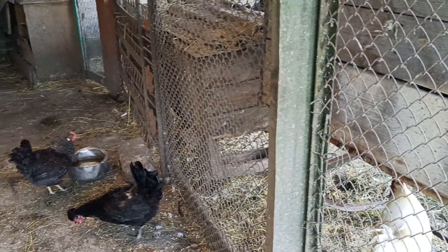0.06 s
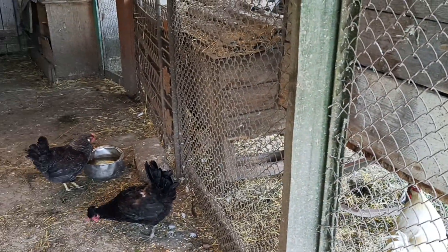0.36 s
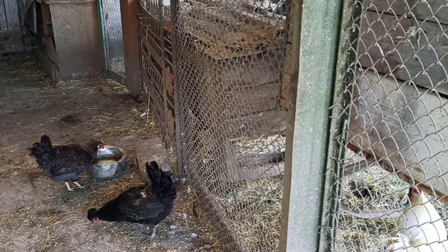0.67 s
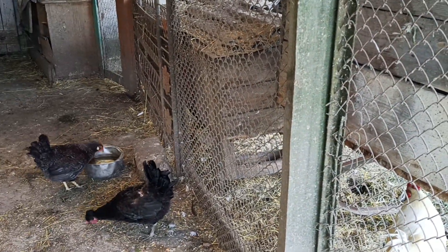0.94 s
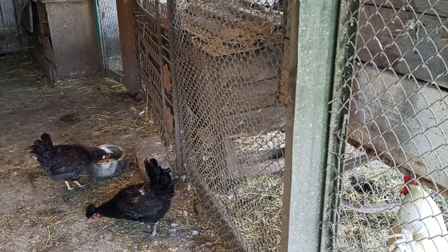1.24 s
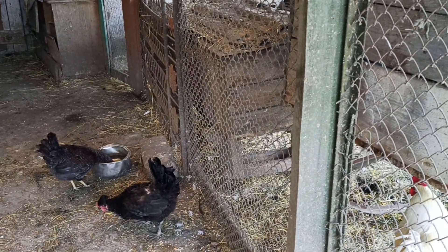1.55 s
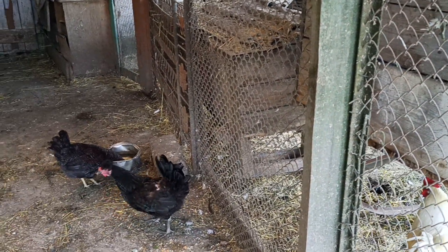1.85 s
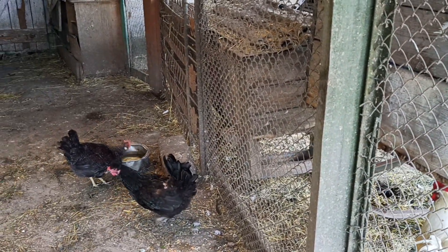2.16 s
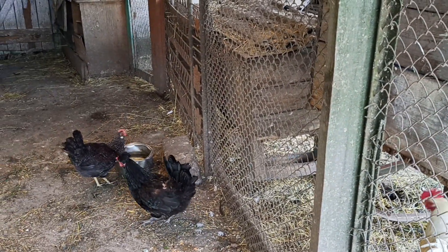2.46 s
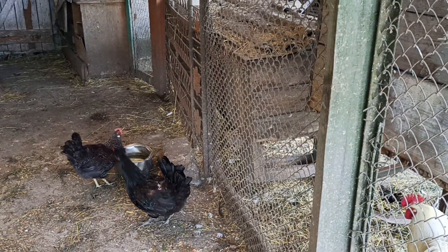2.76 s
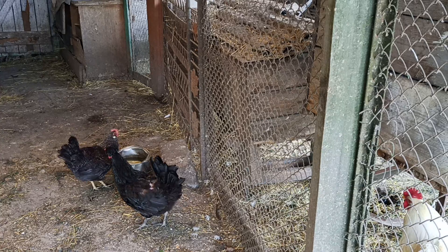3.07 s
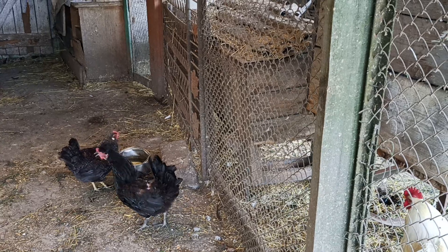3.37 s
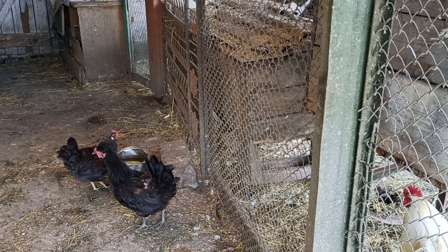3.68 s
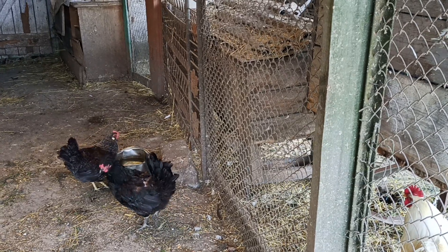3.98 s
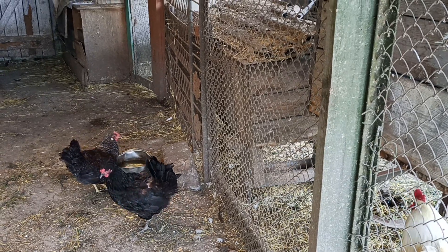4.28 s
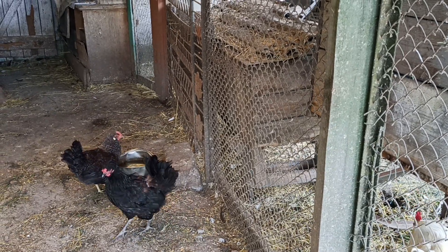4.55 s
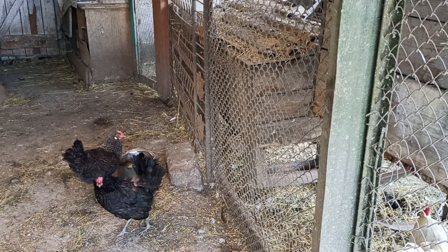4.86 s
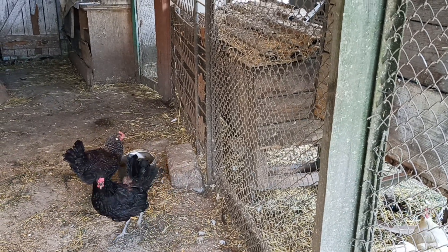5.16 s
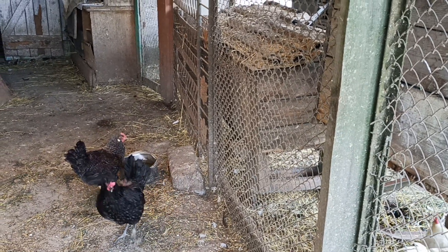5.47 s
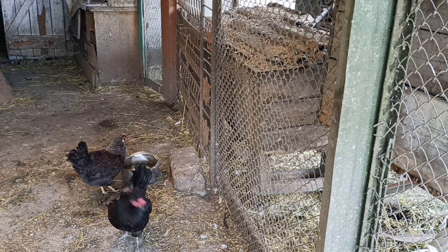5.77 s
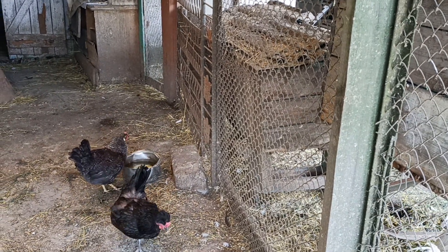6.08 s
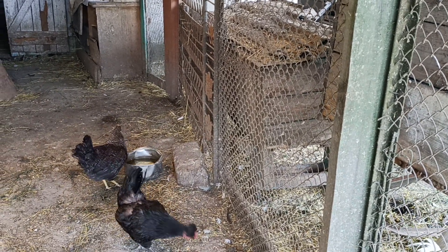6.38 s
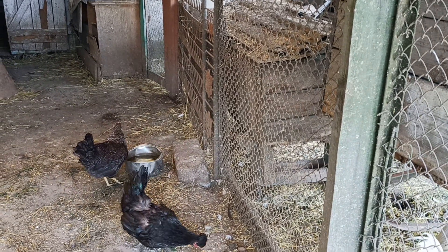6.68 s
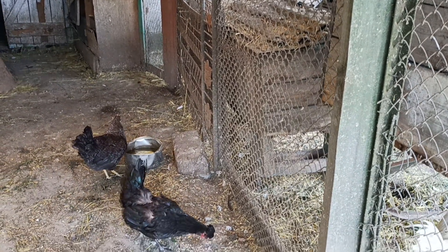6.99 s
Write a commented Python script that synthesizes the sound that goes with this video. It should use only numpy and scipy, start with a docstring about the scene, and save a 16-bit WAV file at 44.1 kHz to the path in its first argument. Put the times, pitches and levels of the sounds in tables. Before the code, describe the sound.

Hens cluck and cackle in a wire coop, one drawing out a hoarse moan, while a small bird chirps faintly far off.

```python
"""Hens cluck in a wire coop with board walls; five times a run of clucks bursts into a loud cackle
whose pitch breaks upward. One hen draws out a hoarse moan, faintly at first and later long and loud.
Each voice is a source and a filter: membranes in the syrinx pulse, and throat and beak resonate.
Beaks tick on the ground, a small bird whistles far off, and the boards reverberate over faint air."""
import sys
import numpy as np
from scipy import signal
from scipy.fft import rfft, irfft, next_fast_len
from scipy.io import wavfile
from scipy.ndimage import uniform_filter1d, minimum_filter1d, map_coordinates

SR = 44100
rng = np.random.default_rng(int(sys.argv[2]) if len(sys.argv) > 2 else 0)


def store_pcm(level_fs):
    """Save levels as 16-bit WAV."""
    pcm = np.round(np.clip(level_fs, -1, 1) * 32767).astype(np.int16)
    wavfile.write(sys.argv[1], SR, np.atleast_2d(pcm).T)


N = 314433
TOP_HZ = 15700
# Resonances and nulls of windpipe and beak. Each row: centre in Hz, width in Hz, gain in dB.
BEAK_MODES = [(1880, 270, 0), (3856, 160, 2.5), (5153, 440, 4.5), (8300, 2000, -3.5), (9150, 1100, 4),
              (11270, 790, 5)]


def cackles(break_s=.018, beak_s=.014, db_per_octave=31):
    """Register breaks: a clear arched note jumps to a higher cry, then falls in a harsh screech."""
    # Each row: start and lengths of note, cry, screech and opening scoop in seconds; note pitch in Hz;
    # its arch and catch as shares of pitch; cry pitch in Hz; note level, note treble, cry level,
    # cry treble, cry swell, screech level and relative chest level in dB; note roughness and
    # the cry's period doubling from 0 to 1.
    calls = [(0.074, 0.14, .052, .038, .017, 489.8, -.05, 0.00072, 602.8, -19.5, -14, -16, -17.5, -6, -14, -10, .05, 0.2),
             (1.737, 0.11, .057, .068, .012, 483.2, .1, .05, 554.4, -18, -13, -15, -19.5, 2.5, -17, -13, .1, 0.4),
             (3.45, .08, .063, 0.055, .021, 541.4, .04, .045, 563, -14, -16.5, -14, -20.5, 3, -18, -14.5, .12, .65),
             (5.318, .113, .056, .04, .014, 470, -.028, 0, 557.8, -20, -10, -17.5, -19.5, -2.5, -15, -7.5, 0.01, .12),
             (6.911, .123, .064, .034, .016, 511.2, .065, .145, 580.7, -18.5, -25.5, -14, -20, 4, -11.5, -17, .22, 0.17)]
    # Throat and beak response, one list a cackle. Each point: frequency in Hz, gain in dB.
    throats = [
        [(210, -88.5), (350, -62.5), (466, -8), (837, -26.5), (951, -11.5), (1100, -11), (1190, -5),
         (1660, -20.5), (1910, -12.5), (2620, -24.5), (3330, -9), (4500, -25.5), (5360, -17.5), (13700, -47.5),
         (15500, -52)],
        [(210, -74.5), (350, -42), (537, -23), (715, -24.5), (851, -25), (1060, -6), (1280, -13), (1760, -16.5),
         (1940, -10), (2390, -16), (3840, -15.5), (4500, -32.5), (5190, -18), (11300, -41.5), (15500, -51)],
        [(210, -95), (350, -51.5), (554, -29), (738, -29), (811, -27.5), (997, -20), (1100, -10.5), (1390, -13),
         (1530, -32.5), (1680, -16), (2310, -11), (3170, -36.5), (3660, -17.5), (6080, -25.5), (15500, -53)],
        [(210, -57.5), (350, -33.5), (451, -9), (554, -11), (692, -48), (892, -7), (1100, -2.5), (1410, -9),
         (1510, -21), (1850, -2.5), (2390, -27.5), (3280, -7), (4290, -27.5), (5190, -15.5), (15500, -46)],
        [(210, -71), (350, -42), (488, -24.5), (837, -36.5), (906, -16), (981, -27.5), (1150, -2.5),
         (1260, -30.5), (2170, -25), (2620, -38), (3440, -18.5), (4430, -39), (5710, -27.5), (6790, -41.5),
         (15500, -61)],
    ]
    # Low rush of air in a rough voice. Each row: frequency in Hz, gain in dB.
    puff_spectrum = [(50, -23.5), (150, -10), (250, 1.5), (380, 0.5), (700, -29), (2000, -70)]
    out = np.zeros(N)
    for row, throat in zip(calls, throats):
        (s, note_s, cry_s, screech_s, scoop_s, note_hz, arch, catch, cry_hz, note_db, note_treble_db,
         cry_db, cry_treble_db, swell_db, screech_db, chest_db, note_rough, cry_doubling) = row
        t = np.arange(int((note_s + cry_s + screech_s) * SR)) / SR
        broken, harsh = ramp(t, note_s, break_s), ramp(t, note_s + cry_s, break_s)

        def stages(note, cry, screech):
            return (1 - broken) * note + (broken - harsh) * cry + harsh * screech

        onset, middle = bump(t, 0, scoop_s), bump(t / note_s, at=.62, width=.22)
        dip = catch * bump(t, at=note_s - .015, width=.015)  # the voice catches before the break
        crack = np.minimum(dip / .05, 1)
        bend = (1 - .15 * onset) * (1 + arch * middle) * (1 - dip)
        push = np.clip((t - note_s) / cry_s, 0, 1) - .5  # progress through the cry
        spent = np.clip((t - note_s - cry_s) / screech_s, 0, 1)  # progress through the screech
        pitch = stages(note_hz * bend,
                       cry_hz * (1 + .055 * push - .03 * (2 * push) ** 2),
                       cry_hz * (1 - .15 * np.sqrt(spent)))
        db = stages(note_db + db_per_octave * np.log2(bend) - 2.5 * onset - 2.5 * crack,
                    cry_db + swell_db * push,
                    screech_db - 4.5 * spent)
        treble_db = stages(note_treble_db - 5.5 * middle,
                           cry_treble_db + 5.5 * push,
                           cry_treble_db + 6 - 16 * spent)
        rough = stages(note_rough + .5 * onset + .25 * crack, .2, .98)
        doubling = stages(.21 * cry_doubling, cry_doubling, .49)
        source = syrinx(pitch, rough, doubling, jitter=.09, flutter_rate=260, breath=.9, waver=.008)
        source = scattered(source, spread_s=.009)
        body, treble = split(peaks(coloured(source, throat), BEAK_MODES), hz=1400)
        chest, mouth = split(body, hz=680)
        chest = amp(chest_db - 3 * harsh) * steady(chest)
        puff = amp(-28) * rough * noise(len(t), puff_spectrum)
        opening = ramp(t, beak_s, 2 * beak_s)  # the treble comes in as the beak opens
        call = amp(db) * (steady(mouth) + chest + puff) + amp(treble_db) * opening * steady(treble)
        add(out, s, call * signal.windows.tukey(len(call), .07))
    return out


def clucks(start_hz=195, clearest_hz=445, rise_share=.5, sag=.12):
    """Formant tuning: a low croak slides up until its second harmonic meets the mouth's resonance."""
    # Each row: start and length in seconds, top pitch in Hz, level in dB, relative treble in dB.
    calls = [(-0.04, 0.056, 385.5, -20.5, -7.5), (0.45, 0.06, 495.8, -18.5, -12.5),
             (0.645, 0.06, 347.6, -24.5, -10.5), (0.788, 0.043, 273.3, -51.5, -6),
             (1.472, 0.028, 357.5, -70.5, -3.5), (1.513, 0.064, 260, -33.5, -8.5),
             (1.608, 0.066, 412, -28.5, -4), (2.074, 0.07, 485, -20, -1), (2.297, 0.06, 460.6, -23.5, -5.5),
             (2.532, 0.06, 414.5, -25.5, -9.5), (2.808, 0.06, 407, -29.5, -6),
             (3.049, 0.065, 409.4, -28, -7), (3.268, 0.068, 429.2, -24.5, -1),
             (3.769, 0.066, 432.4, -25.5, -6), (4.005, 0.057, 241.2, -36, -12.5),
             (4.139, 0.035, 298.4, -61, -3), (4.642, 0.025, 288.7, -32.5, -7),
             (4.835, 0.039, 595, -24.5, -23.5), (4.928, 0.05, 656.3, -24, -15.5),
             (5.142, 0.068, 408.2, -18.5, -7.5), (5.657, 0.062, 459.4, -23, -5.5),
             (5.893, 0.055, 383.5, -26.5, -14.5), (6.482, 0.06, 248.2, -34.5, -13),
             (6.711, 0.068, 401.3, -23.5, -11)]
    # Response of the half-closed throat. Each row: frequency in Hz, gain in dB.
    throat = [(100, -29.5), (200, 0), (420, -0.5), (600, 3), (820, 0), (1150, 2), (1450, -12.5),
              (1900, -7.5), (2250, -15.5), (2800, -11), (3600, -10), (4700, -25), (6300, -24), (8000, -35),
              (11000, -39), (15500, -42.5)]
    out = np.zeros(N)
    for s, length, top_hz, db, treble_db in calls:
        progress = np.linspace(0, 1, int(length * SR))
        climb = np.sin(np.pi / 2 * np.minimum(progress / rise_share, 1)) ** 3
        pitch = start_hz + (top_hz - start_hz) * climb
        pitch *= 1 - sag * np.maximum(progress / rise_share - 1, 0) ** 3  # sags as the beak shuts
        rough = .27 + .6 * abs(np.log2(top_hz / clearest_hz)) + .3 * (1 - progress) ** 3
        source = syrinx(pitch, rough, doubling=0, jitter=.1, flutter_rate=260, breath=1, waver=.022)
        source = scattered(source, spread_s=.007)
        mouth_mode = (max(2.03 * top_hz, 700), 260, 7)
        voiced = peaks(coloured(source, throat), list(BEAK_MODES) + [mouth_mode])
        body, treble = split(voiced, hz=1490)
        chest, mouth = split(body, hz=520)
        opening = np.abs(np.sin(np.pi * progress ** 1.297))  # an open beak is brighter
        chest_db = .64 * (-43.5 - db)  # soft clucks are mostly chest
        chest = amp(chest_db) * (.37 + .73 * opening ** 2) * steady(chest)
        mouth = amp(2.5) * (.17 + .82 * opening ** 2) * steady(mouth)
        treble = amp(treble_db + 1) * opening ** 1.61 * steady(treble)
        add(out, s, amp(db) * (chest + mouth + treble) * signal.windows.tukey(len(pitch), .08))
    return out


def moans(attack_s=.41, release_s=.16, tire_db_per_s=8.5):
    """Turbulence rasps through windpipe resonances over a note that swells, falters once and tires."""
    # Each row: start and length in seconds, pitch in Hz, tone level in dB, rasp level in dB.
    calls = [(0.301, 1.16, 468, -71, -54), (4.29, 1.65, 480, -26.5, -31.5)]
    # Spectra of the throat and of the rasping air. Each row: frequency in Hz, gain in dB.
    throat = [(200, -32.5), (400, -5), (520, -2.5), (950, -17.5), (1450, -24), (2000, -37.5), (3000, -38),
              (6000, -63)]
    rasp_spectrum = [(120, -54), (200, -16.5), (293, -20), (422, 0), (497, -1.5), (690, -19.5),
                     (940, -20.5), (1110, -28), (1450, -16.5), (2060, -24.5), (2600, -18), (4330, -35.5),
                     (6240, -37), (7090, -45.5), (15500, -59)]
    # Resonances of the narrowed windpipe. Each row: centre in Hz, width in Hz, gain in dB.
    windpipe_modes = [(790, 260, 11), (2580, 100, 6.5), (3770, 220, 9), (6136, 170, 15.5)]
    out = np.zeros(N)
    for s, length, top_hz, tone_db, rasp_db in calls:
        t = np.arange(int(length * SR)) / SR
        attack, release = np.minimum(t / attack_s, 1), np.minimum((length - t) / release_s, 1)
        falter = bump(t, at=.56, width=.07)
        effort_db = -7 * falter - tire_db_per_s * np.maximum(t - attack_s, 0)
        effort_db += 1.25 * wobble(len(t), rate=11)
        pitch = top_hz * (1 - .09 * falter - .18 * (t / length) ** 5)
        rough = .45 - .035 * effort_db  # the weaker the note, the hoarser
        source = syrinx(pitch, rough, doubling=0, jitter=.09, flutter_rate=200, breath=.71, waver=.012)
        tone = unit(coloured(source, throat))
        air = coloured(rng.standard_normal(len(t)) * amp(2.2 * wobble(len(t), rate=160)), rasp_spectrum)
        low, high = split(peaks(air, list(windpipe_modes) + list(BEAK_MODES)[-3:]), hz=620)
        tone = amp(tone_db + effort_db) * attack ** 1.38 * release ** 2 * tone
        rasp = amp(rasp_db + .42 * effort_db) * attack ** 1.73 * release * unit(high + .44 * low)
        add(out, s, tone + rasp)
    return out


def syrinx(pitch, rough, doubling, jitter, flutter_rate, breath, waver):
    """Membrane oscillation: roughness scatters the pulses' timing and size and leaks air each cycle."""
    n = len(pitch)
    rough = np.clip(rough, 0, 1)
    drift = waver * wobble(n, rate=85) + jitter * rough * wobble(n, flutter_rate)
    phase = 2 * np.pi * np.cumsum(pitch * (1 + drift)) / SR
    harmonics = np.arange(1, int(TOP_HZ / np.median(pitch)) + 2)[:, None]
    pulses = unit(np.sum(np.cos(harmonics * phase) * (harmonics * pitch < TOP_HZ), axis=0))
    # Alternate strong and weak pulses put lines halfway between the harmonics.
    pulses *= 1 + doubling * np.cos(phase / 2)
    pulses *= amp(3.1 * rough * wobble(n, flutter_rate))
    air = unit(rng.standard_normal(n) * (1.2 + np.cos(phase)))
    return unit(pulses + breath * rough * air)


def pecks(t60_s=.028):
    """Damped impacts: a beak among straw and grit makes broadband ticks that decay exponentially."""
    # Each row: start in seconds, level in dB.
    strikes = [(1.116, -59.5), (1.399, -70), (5.948, -35), (6.234, -59), (6.602, -53)]
    out, t = np.zeros(N), np.arange(SR // 10) / SR
    for s, db in strikes:
        tick = noise(len(t), [(300, -18.5), (2000, -7), (7000, -4), (15000, -8)])
        add(out, s, amp(db - 60 * t / t60_s) * tick)
    return out


def far_bird(chirp_s=.045, twitter_per_s=28, twitter_hz=3800, glide=.03):
    """Frequency modulation: thin whistles glide with a fast, uneven trill, amid a fainter twitter."""
    # The clearest whistles. Each row: start in seconds, first and last pitch in Hz, level in dB.
    chirps = [(0.582, 4370, 6130, -50.5), (0.907, 4710, 3530, -45.5), (0.954, 3940, 2900, -47.5),
              (1.09, 3890, 3310, -51.5), (2.668, 4410, 4040, -54.5), (3.215, 4060, 3630, -57)]
    out, n = np.zeros(N), int(chirp_s * SR)
    count = int(twitter_per_s * N / SR)
    twitter = []
    for k, (late, high, loud) in enumerate(rng.standard_normal((count, 3))):
        s = np.clip((k + late) / twitter_per_s, 0, (N - n) / SR)
        hz = twitter_hz * np.exp(.17 * high)
        twitter.append((s, hz * (1 + glide), hz * (1 - glide), -63 + 2 * loud))
    for s, from_hz, to_hz, db in list(chirps) + twitter:
        hz = np.linspace(from_hz, to_hz, n) * (1 + .045 * wobble(n, rate=500))
        add(out, s, amp(db) * np.hanning(n) * np.sin(2 * np.pi * np.cumsum(hz) / SR))
    return out


def scattered(x, spread_s, count=9):
    """Interference: treble thrown back by ground, posts and boards makes moving overtones flicker."""
    bounces = np.zeros(SR // 20)
    lags = np.clip(rng.uniform(.0005, spread_s, count) * SR, 1, len(bounces) - 1).astype(int)
    bounces[lags] = rng.choice([-1, 1], count) / np.sqrt(count)
    _, treble = split(signal.fftconvolve(x, bounces)[:len(x)], hz=1240)
    return x + treble


def coop(x):
    """Diffuse reverberation from the boards; its pattern changes as the hens move their heads."""
    # Each row: frequency in Hz, time to decay by 60 dB in seconds.
    decay_times = [(200, 0.26), (1000, 0.23), (4000, 0.23), (8000, 0.2), (15000, 0.12)]
    out, hop = np.zeros(N), SR // 3
    samples = np.arange(N)
    for centre in range(0, N + hop, hop):
        hz, age, spectra = signal.stft(rng.standard_normal(SR // 2), SR, nperseg=256)
        decay = amp(-60 * age / along(decay_times, hz)[:, None])
        _, tail = signal.istft(spectra * decay, SR)
        near = np.abs(samples - centre) < hop
        piece = x[near] * np.cos(np.pi / 2 * (samples[near] - centre) / hop)
        add(out, max(centre - hop, 0) / SR, signal.fftconvolve(piece, tail / np.linalg.norm(tail)))
    return out


def far_wall(x, delay_s=.066, echo_db=-23):
    """A single reflection: the back of the shed returns a dull, delayed slap."""
    dull, _ = split(x, hz=2200)
    return amp(echo_db) * np.pad(dull, (int(delay_s * SR), 0))[:N]


def yard(air_db=-61, rumble_db=-67):
    """Broadband ambient noise: faint outdoor air flickers slightly over a low rumble."""
    # Each row: frequency in Hz, gain in dB.
    air_spectrum = [(15, -45.5), (25, -18.5), (144, -4.5), (221, -4), (289, -2.5), (1270, -13.5),
                    (1530, -16.5), (2360, -18), (2770, -16), (3340, -10), (6210, -18), (7700, -26.5),
                    (15500, -25.5)]
    rumble = noise(N, [(20, -15), (60, -8.5), (120, -9.5), (300, -22), (1000, -73.5)])
    return amp(air_db + wobble(N, rate=24)) * noise(N, air_spectrum) + amp(rumble_db) * rumble


def amp(db):
    """Decibels to gain."""
    return 10 ** (np.asarray(db) / 20)


def unit(x):
    """Scale to rms 1."""
    return x / np.sqrt(np.mean(x ** 2) + 1e-20)


def steady(x):
    """Even out slow swells to rms 1."""
    return x / np.sqrt(np.abs(uniform_filter1d(x ** 2, size=900)) + 1e-12)


def along(points, hz):
    """Interpolate (Hz, value) points on a log frequency axis."""
    freqs, values = np.transpose(points)
    return np.interp(np.log(hz + 1), np.log(freqs + 1), values)


def wobble(size, rate):
    """A smooth random curve with rate knots a second."""
    return map_coordinates(rng.standard_normal(int(size * rate / SR) + 4), [np.arange(size) * rate / SR])


def ramp(t, at, width):
    """A smooth step from 0 to 1, centred on a time."""
    return .5 + .5 * np.sin(np.pi * np.clip((t - at) / width, -.5, .5))


def bump(t, at, width):
    """A Gaussian bell of height 1, centred on a time."""
    return np.exp(-((t - at) / width) ** 2)


def filtered(x, gain):
    """Zero-phase filtering by a gain that depends on frequency."""
    size = next_fast_len(len(x) + 8192)
    return irfft(rfft(x, size) * gain(np.fft.rfftfreq(size, 1 / SR)), size)[:len(x)]


def coloured(x, spectrum):
    """Minimum-phase filtering by a (Hz, dB) shape."""
    size = 2048
    cepstrum = irfft(np.log(amp(along(spectrum, np.fft.rfftfreq(size, 1 / SR)))))
    cepstrum[1:size // 2] *= 2
    cepstrum[size // 2:] = 0
    return signal.fftconvolve(x, irfft(np.exp(rfft(cepstrum))))[:len(x)]


def noise(size, spectrum):
    """Gaussian noise of rms 1 with a (Hz, dB) shape."""
    return unit(coloured(rng.standard_normal(size), spectrum))


def peaks(x, modes):
    """Filter by (Hz, width Hz, dB) resonances."""
    return filtered(x, lambda f: amp(sum(db / (1 + (2 * (f - hz) / w) ** 2) for hz, w, db in modes)))


def split(x, hz):
    """A crossover: the parts of x below and above hz."""
    low = filtered(x, lambda f: 1 / (1 + (f / hz) ** 10))
    return low, x - low


def add(track, s, x):
    """Mix x into the track from s seconds on."""
    start = round(s * SR)
    x = x[max(-start, 0):N - start]
    track[max(start, 0):][:len(x)] += x


def scene():
    """Direct-to-reverberant ratio sets distance: the hens are near, the bird is mostly reflected."""
    hens = cackles() + clucks() + moans() + pecks()
    bird = far_bird()
    return (amp(-1) * hens + amp(-6) * coop(hens) + far_wall(hens) + .5 * bird + coop(bird) + yard())[None]


def record(dry, ceiling=.88, quiet_db=-55, duck_db=5):
    """Downward expansion lowers quiet stretches, a limiter holds the peaks, a low-pass cuts the top."""
    x = dry[0]
    power = np.abs(uniform_filter1d(x ** 2, size=1300))
    x = x * amp(-duck_db / (1 + (power / amp(quiet_db) ** 2) ** 2))
    allowed_gain = np.minimum(1, ceiling / (np.abs(x) + 1e-9))
    x = x * uniform_filter1d(minimum_filter1d(allowed_gain, size=241), size=241)
    return filtered(x, lambda hz: hz < TOP_HZ)[None]


dry = scene()
out = record(dry)
store_pcm(out)
```